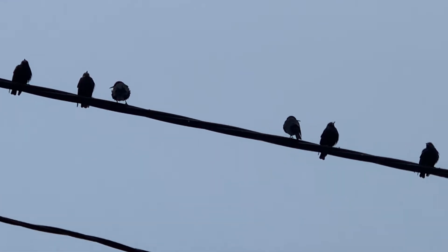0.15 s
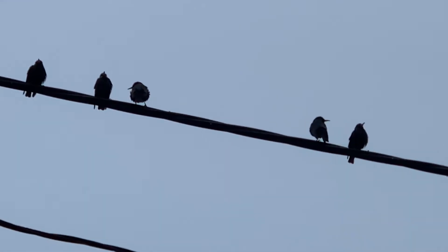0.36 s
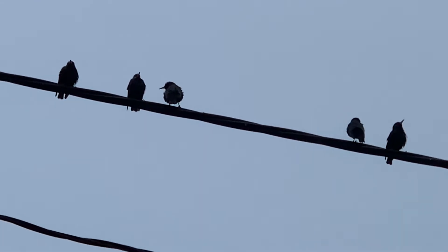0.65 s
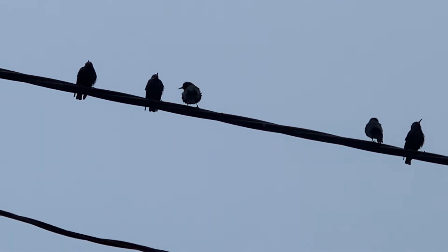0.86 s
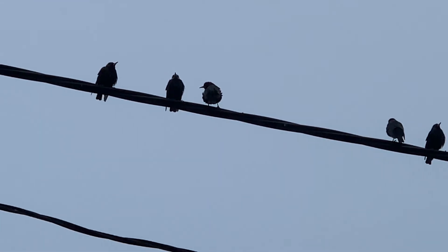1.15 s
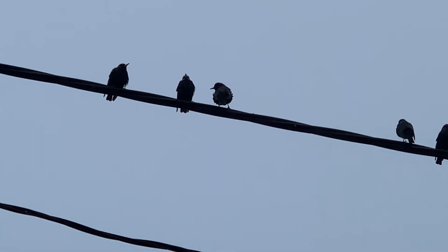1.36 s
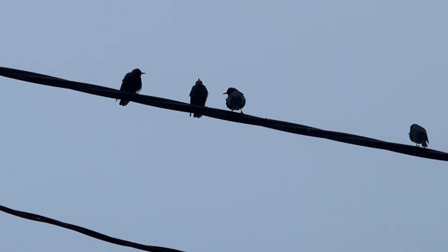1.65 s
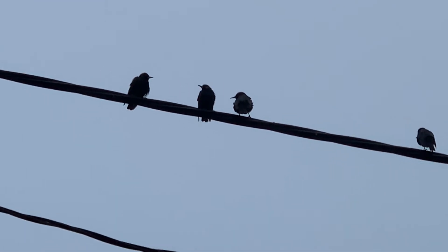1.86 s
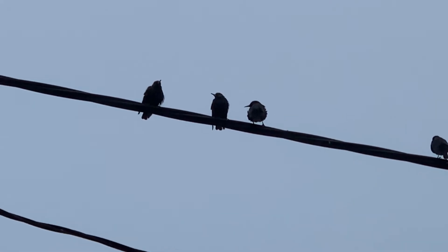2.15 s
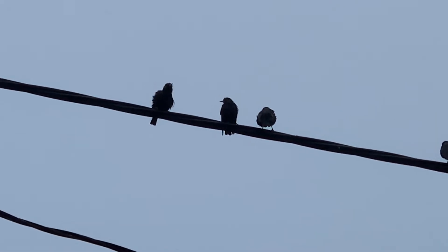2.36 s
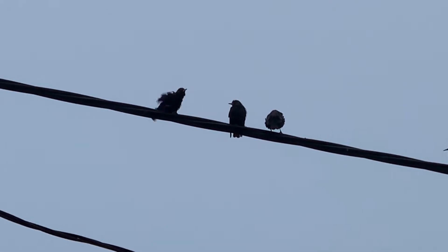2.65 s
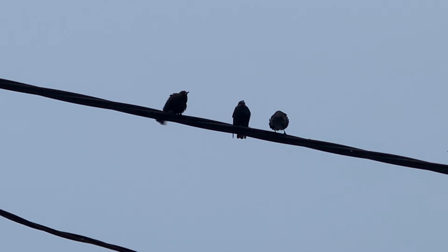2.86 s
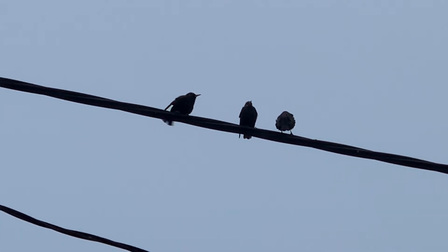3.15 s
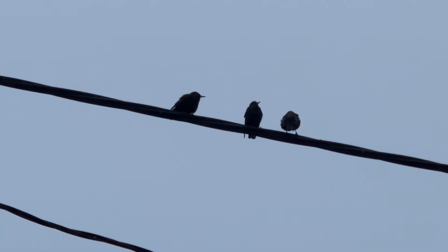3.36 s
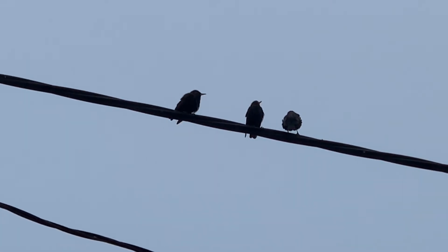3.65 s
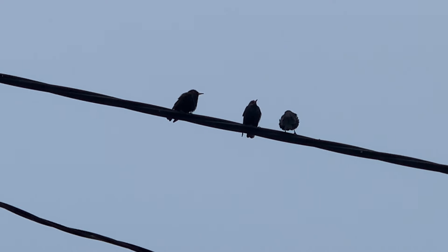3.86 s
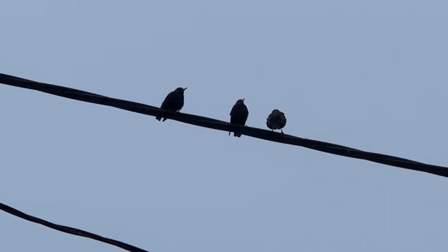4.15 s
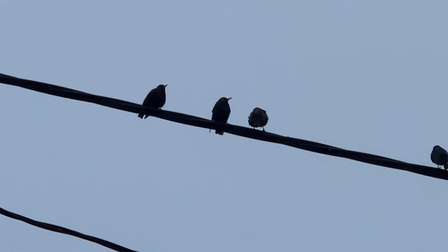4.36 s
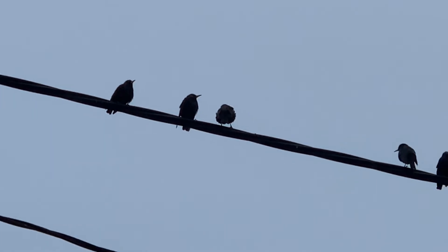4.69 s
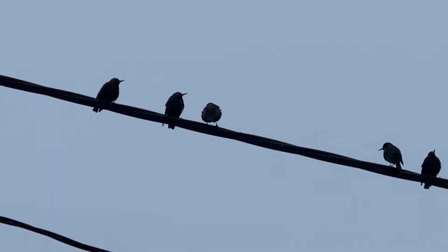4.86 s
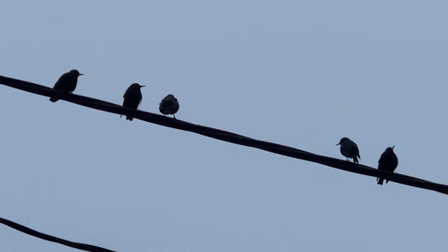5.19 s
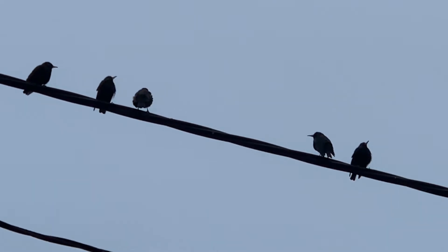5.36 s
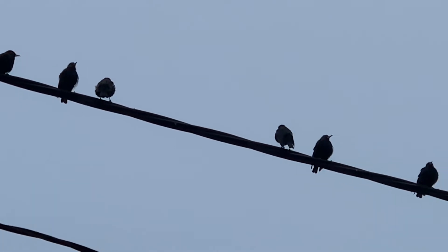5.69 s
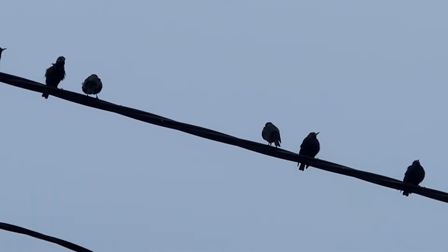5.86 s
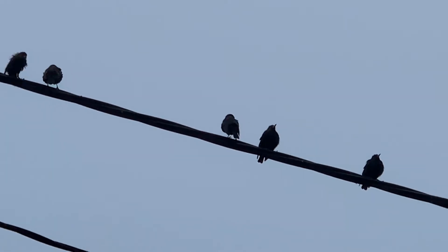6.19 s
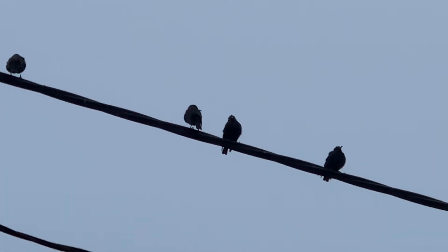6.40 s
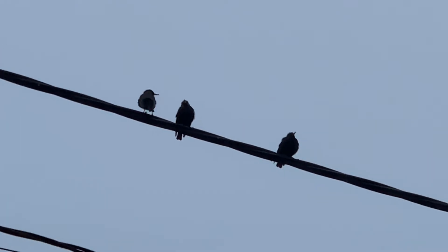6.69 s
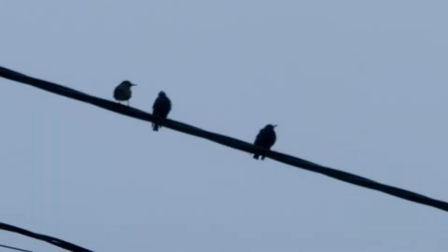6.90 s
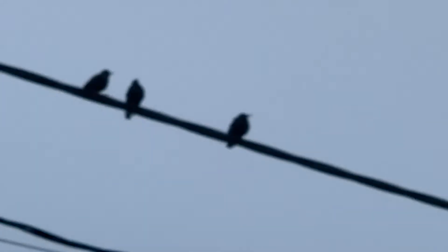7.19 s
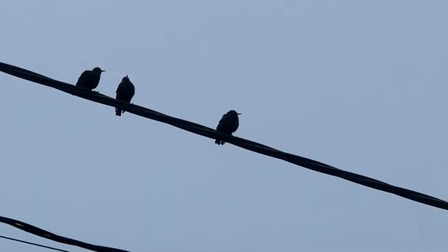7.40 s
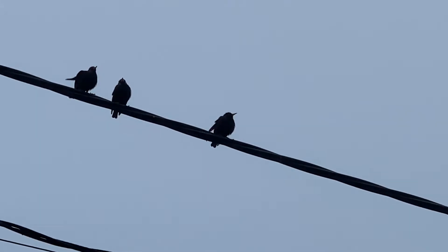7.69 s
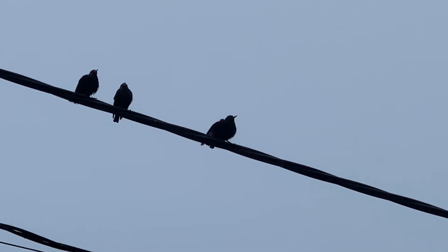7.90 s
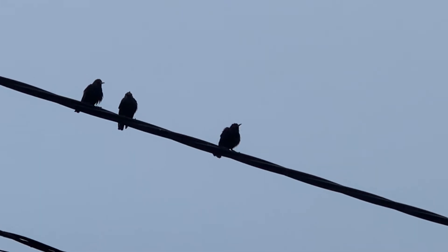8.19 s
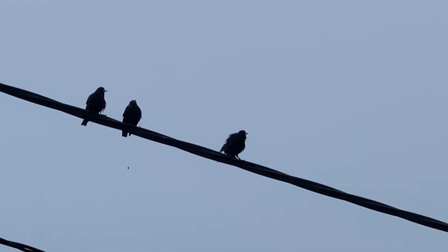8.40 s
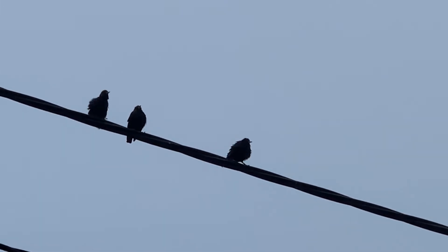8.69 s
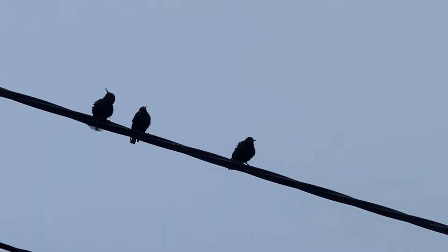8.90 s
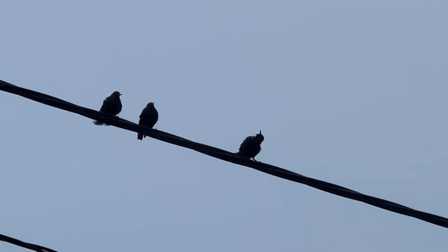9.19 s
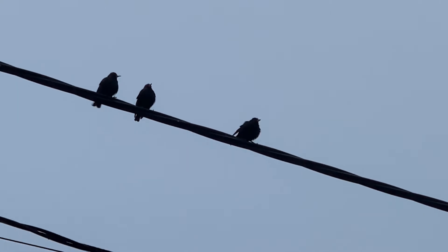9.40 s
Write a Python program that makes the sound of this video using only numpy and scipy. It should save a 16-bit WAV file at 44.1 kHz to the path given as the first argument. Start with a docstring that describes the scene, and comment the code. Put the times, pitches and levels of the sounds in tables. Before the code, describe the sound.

Starlings on overhead wires whistle, chirp and rasp throughout, one repeating a quick zigzag chirrup. The rest of the flock blurs into distant chatter with a light outdoor echo. In the second half, piercing high squeals and brief buzzes lead into a busier, hoarse flurry. Far traffic rumbles faintly underneath, and short knocks with soft thumps sound on the hand-held microphone now and then.

```python
"""Starlings on overhead wires

Near birds whistle, warble and rasp, and one keeps repeating a zigzag chirrup. Each voice is one tone
from the bird's voice box, shaken to make it hoarse. The rest of the flock blurs into far chatter with
outdoor echoes. Far traffic rumbles and hums, and the hand-held camera's body knocks now and then."""
import sys
import numpy as np
from scipy import signal
from scipy.fft import rfft, irfft, next_fast_len
from scipy.io import wavfile
from scipy.ndimage import uniform_filter1d, map_coordinates

SR = 44100
rng = np.random.default_rng(int(sys.argv[2]) if len(sys.argv) > 2 else 0)


def transcribe(signal):
    """Save signal, clipped to [-1, 1], as a 16-bit WAV file at the path in sys.argv[1]."""
    frames = np.atleast_2d(signal).T
    limited = np.clip(frames, -1, 1)
    pcm = np.round(limited * 32767).astype(np.int16)
    wavfile.write(sys.argv[1], SR, pcm)


N = 420713

# base loudness of the far flock: time_s, level_db
FLOCK_LEVEL = [(0.0, -59), (5.3, -58.5), (6.4, -57.5), (7.78, -57.5), (7.92, -56.5), (8.56, -61),
               (8.9, -56.5), (9.06, -56), (9.54, -57)]
STEPS = np.arange(-4, 5) / 4  # points in a note: -1 start, 0 loudest, 1 end


def amp(db):
    """Turn decibels into a gain."""
    return 10 ** (np.asarray(db) / 20)


def unit(x):
    """Scale to an average power of 1."""
    return x / np.sqrt(np.mean(np.abs(x) ** 2) + 1e-20)


def along(points, hz):
    """Read between (hz, value) points on a log scale."""
    known_hz, values = np.transpose(points)
    return np.interp(np.log(hz + 1), np.log(known_hz + 1), values)


def curve(rows):
    """Join (time, level) points into one value per sample."""
    return np.interp(np.arange(N) / SR, *np.transpose(rows))


def wobble(rate, size=N):
    """A smooth random curve through rate points a second."""
    points = rng.standard_normal(int(size * rate / SR) + 4)
    return map_coordinates(points, [np.arange(size) * rate / SR])


def filtered(x, response):
    """Multiply each frequency in x by response(hz)."""
    size = next_fast_len(N + SR // 2)
    return irfft(rfft(x, size) * response(np.fft.rfftfreq(size, 1 / SR)), size)[..., :N]


def add(track, start_s, sound):
    """Mix a sound into the track."""
    part = track[max(round(start_s * SR), 0):][:len(sound)]
    part += sound[:len(part)]


def rush(spectrum, alike, patchy_db):
    """Stereo noise with louder and softer patches; alike=1 makes both sides equal."""
    noise = signal.stft(rng.standard_normal((2, N)), nperseg=512)[2]
    patches = uniform_filter1d(uniform_filter1d(rng.standard_normal(noise.shape[1:]), 6, 0), 10, 1)
    pair = signal.istft(noise * amp(patchy_db * unit(patches)), nperseg=512)[1][:, :N]
    middle, side = filtered(pair, lambda hz: amp(along(spectrum, hz)))
    turn = np.arccos(alike) / 2
    return unit(np.cos(turn) * middle + np.sin(turn) * np.array([side, -side]))


def sing(track, note, hoarse, flutter_hz=None, edge_s=0.0054):
    """Add one tone through (time, pitch, level) points; hoarseness shakes its size and phase."""
    flutter_hz = flutter_hz or 160 + 650 * hoarse
    times, hz, db = np.transpose(note)
    t = np.arange(times[0] - edge_s, times[-1] + edge_s, 1 / SR)
    fade = np.clip(np.minimum(t - t[0], t[-1] - t) / (2 * edge_s), 0, 1) ** 2
    shake = wobble(flutter_hz, len(t)) + 1j * wobble(flutter_hz, len(t))
    share = np.clip(hoarse, 0, 1)  # 0 is clear, 1 is all rasp
    pitch = uniform_filter1d(np.interp(t, times, hz), size=SR // 250)  # rounds the turns
    pitch *= 1 + .006 * wobble(45, len(t))  # a slight waver
    wave = np.exp(2j * np.pi * np.cumsum(pitch) / SR)
    overtone = amp(-31 + 20 * np.log2(pitch / 6500)) * wave ** 2  # clearer on high notes
    tone = np.real((np.sqrt(2 - 2 * share) + np.sqrt(share) * shake) * (wave + overtone))
    breakup_db = 3.5 * np.sqrt(share) * wobble(90, len(t))
    add(track, t[0], fade * amp(np.interp(t, times, db) + breakup_db) * tone)


def swell(rise_s, fall_s, swell_db_per_s=122.5, fade_db_per_s=88):
    """A note grows and dies away: times from its loudest point, and dB below it."""
    offset_s = np.where(STEPS < 0, rise_s, fall_s) * STEPS
    return offset_s, np.where(STEPS < 0, swell_db_per_s, fade_db_per_s) * abs(offset_s)


def far_birds(count=1000):
    """Short, slightly hoarse chirps rise, fall or peak at random moments."""
    out = np.zeros(N)
    for when, pitch, bend, tilt, life, softness in rng.random((count, 6)):
        start_s, length_s = when * N / SR, .012 + .045 * life ** 3
        hz = 2600 * 1.95 ** pitch
        db = -9 * softness - 16 * abs(np.log2(hz / 3700))
        note = [(start_s, hz * (1 - .2 * tilt), db - 4.5),
                (start_s + length_s / 2, hz * (.95 + 0.14 * bend), db),
                (start_s + length_s, hz * (0.75 + 0.35 * tilt), db - 2)]
        sing(out, note, hoarse=.4, flutter_hz=400)
    return amp(curve(FLOCK_LEVEL)) * unit(out)


def haze(join_in):
    """The farthest birds blur into a hiss that swells a little with the flock."""
    # tone colour of the blurred flock and air: frequency_hz, relative_db
    spectrum = [(710, -21), (1200, -23), (1840, -9), (4110, -7), (5430, -14), (6590, -12.5), (7330, -21.5),
                (8700, -19), (9280, -24.5), (10200, -38.5), (13800, -45.5), (15500, -36.5)]
    return amp(0.71 * curve(FLOCK_LEVEL) - 18.5) * join_in ** .5 * rush(spectrum, 0.27, patchy_db=4.3)


def traffic():
    """Far traffic makes a low, lumpy rumble."""
    # loudness of the traffic: time_s, level_db
    levels = [(0.0, -54), (.6, -53.5), (2.63, -57), (5.98, -56.5), (9.19, -63), (9.54, -54.5)]
    # tone colour of the rumble: frequency_hz, relative_db
    spectrum = [(13, -36.5), (28, -0.5), (50, 3), (107, -3.5), (130, -7), (167, -12), (381, -28.5),
                (701, -30.5), (1600, -26), (2080, -68), (3520, -120)]
    return amp(curve(levels) + 1.3 * wobble(6)) * rush(spectrum, 0.92, patchy_db=2.2)


def chirrups(track):
    """One bird repeats a zigzag, a little different each time."""
    # shape of the zigzag: offset_s, pitch_hz, relative_db
    zigzag = [(-.029, 3400, -14), (-.012, 4200, -8), (-.005, 5300, 0), (.014, 5150, 0), (.031, 3800, 0),
              (.04, 4480, -2), (.05, 3300, -6), (.055, 3250, -22), (.063, 3400, -12), (.074, 4050, -4),
              (.086, 4600, -1), (.101, 3450, -5)]
    # each chirrup: time_s, level_db, pitch_factor, length_factor, opening_db
    calls = [(0.055, -48.5, .98, 1.0, -15), (1.168, -53, .98, 1.0, -6), (1.875, -45, 1.02, 1.0, -12),
             (2.59, -45, 1.0, 1.02, -14), (3.358, -46, 1.03, 1.02, -11), (4.394, -44, 1.0, 1.02, -13),
             (5.264, -49, 1.02, 1.08, -10), (5.914, -46, 1.0, 1.0, -12), (6.508, -42, 1.0, 0.98, -11),
             (7.459, -43, 1.0, 0.98, -13), (7.767, -46.5, 1.0, 1.0, -26), (8.97, -45, 0.91, 1.0, -26)]
    for time_s, db, pitch, length, opening_db in calls:
        note = np.array(zigzag) * [length, pitch, 1] + [time_s, 0, db]
        note[:4, 2] += opening_db  # softens the rise and first top
        sing(track, note, hoarse=.08, flutter_hz=330)


def echoes(x, decay_s):
    """Ground, trees and walls scatter the sound back; treble dies sooner."""
    hz, t, noise = signal.stft(rng.standard_normal((2, SR // 2)), SR, nperseg=256)
    fade = amp(-60 * t / decay_s * (0.18 + hz[:, None] / 9000))
    tail = signal.istft(noise * fade, SR, nperseg=256)[1]
    delayed = np.pad(x, (300, 0))[None]
    return signal.fftconvolve(delayed, tail / np.linalg.norm(tail[0]), axes=1)[:, :N]


def shell_tones(t):
    """The camera's shell rings for a few cycles, one row per tone."""
    # tones of the shell: pitch_hz, relative_db, ring_s
    tones = [(814, 7.5, 0.009), (1260, 1, 0.0064), (422, -15, 0.012)]
    rings = np.array([amp(db - 60 * t / ring_s) * np.sin(2 * np.pi * hz * t) for hz, db, ring_s in tones])
    return rings * (1 - np.exp(-t / 0.0029)) ** 2


def knocks(track):
    """A blow rings the shell, and a low tone follows it, sliding down in pitch."""
    # blows on the camera body: time_s, base_db, extra_thump_db
    blows = [(0.088, -42.5, 6), (0.101, -42.5, 5.5), (0.435, -62, 21), (0.473, -47.5, 4),
             (1.282, -55.5, 16), (1.31, -49.5, -4), (1.467, -29, -6), (1.815, -33, -7.5), (2.15, -29.5, -9),
             (2.454, -38, -7), (2.48, -41.5, -5.5), (3.002, -51, 3), (3.253, -66, 20), (4.526, -47, 2),
             (4.748, -72, 23), (5.163, -54.5, 14.5), (7.021, -55, 10), (7.308, -42, 4), (7.331, -50.5, 4),
             (7.37, -46.5, 13.5), (7.482, -33, -6.5), (7.867, -27.5, -7), (8.397, -35, -1.5),
             (8.662, -36, -7), (8.703, -49, -2)]
    t = np.arange(SR // 12) / SR
    tones = shell_tones(t)
    phase = 2 * np.pi * np.cumsum(45 + 500 * np.exp(-t / 0.00637)) / SR
    thump = np.sin(phase) * (1 - np.exp(-t / 0.028)) * amp(-60 * t / 0.085)
    for time_s, db, thump_db in blows:
        ring = amp(1.5 * rng.standard_normal(len(tones))) @ tones  # each blow hits another spot
        add(track, time_s - .001, amp(db + 19.5) * ring + amp(db + thump_db + 11.5) * thump)


def glides(track):
    """Near birds hold a note or slide straight up or down."""
    # sliding notes: loudest_s, swell_s, fade_s, from_hz, to_hz, level_db, hoarseness
    notes = [ (0.219, 0.046, 0.038, 1344, 1275, -62.5, 0.2), (.446, .008, .012, 5000, 2850, -64, 0.1),
             (.5, 0.061, .04, 4690, 5700, -61.5, 0.2), (.507, 0.0068, 0.01, 5600, 3140, -53, 0.15),
             (0.623, 0.014, 0.013, 2990, 1806, -44.5, 1), (.675, 0.014, 0.032, 2090, 2330, -47.5, 0.2),
             (1.025, 0.034, 0.003, 3270, 3480, -52.5, 0.94), (1.042, 0.0031, 0.055, 1700, 1688, -61, 0.1),
             (1.124, .035, .025, 4070, 3920, -58, .6), (1.193, 0.036, 0.016, 2910, 3000, -52.5, 0.4),
             (1.2, 0.07, 0.049, 1423, 1218, -66, 0.03), (1.49, 0.017, 0.022, 2440, 2054, -50, 0.24),
             (1.665, 0.033, 0.032, 4270, 4150, -59, 0.3), (1.727, 0.062, 0.038, 3320, 3080, -53.5, 0.43),
             (2.074, 0.011, 0.02, 3120, 2750, -52, 0.24), (2.12, 0.027, 0.011, 2100, 2400, -46.5, 0.37),
             (2.14, 0.045, 0.096, 4530, 4150, -56, .6), (2.46, 0.078, 0.065, 2960, 2600, -55.5, .3),
             (2.452, 0.0095, 0.015, 3960, 3400, -47.5, .3), (2.508, 0.024, 0.071, 3420, 3220, -47, 0.43),
             (2.825, .027, .027, 4470, 3200, -53.5, 0.25), (2.89, .04, 0.051, 3800, 4070, -54, 0.97),
             (3.008, 0.15, 0.12, 9660, 7200, -65.5, 0.2), (3.102, 0.043, 0.053, 4040, 3470, -52.5, .5),
             (3.254, 0.16, 0.14, 8670, 6300, -67, 0.75), (3.18, 0.013, 0.015, 2715, 2970, -46.5, 0.6),
             (3.355, 0.014, 0.038, 3870, 3700, -51.5, 0.56), (3.42, .04, 0.061, 3300, 3000, -50, 0.94),
             (3.72, 0.025, 0.054, 7600, 7050, -62, 0.2), (3.715, 0.0098, 0.017, 4250, 3940, -48, 0.6),
             (3.999, 0.031, 0.069, 4080, 4050, -56.5, .5), (4.11, 0.064, 0.094, 8980, 7100, -63, 0.7),
             (4.238, 0.025, 0.011, 3470, 2810, -51, 0.5), (4.525, 0.053, 0.063, 3110, 2835, -50, 0.75),
             (4.794, 0.014, 0.0074, 4040, 4000, -49, 0.36), (4.862, 0.035, 0.055, 2830, 3260, -49, .9),
             (4.894, 0.0095, 0.03, 3680, 4350, -49.5, 0.26), (5.305, 0.0051, 0.16, 3855, 3510, -46, 0.78),
             (5.499, 0.017, 0.012, 4250, 5200, -56.5, 0.4), (5.52, .02, 0.011, 3000, 3320, -53, 0.23),
             (5.777, 0.015, 0.02, 4300, 3750, -49.5, 0.14), (6.258, 0.0088, 0.1, 3950, 3980, -56, 0.6),
             (6.41, 0.02, 0.015, 3970, 3980, -51, 0.3), (6.433, 0.011, .008, 3110, 3230, -49.5, 0.52),
             (6.635, 0.04, 0.037, 2530, 2206, -50, 1.1), (6.65, 0.054, 0.046, 1500, 1350, -63.5, 1.13),
             (7.336, 0.014, 0.035, 4040, 3500, -49, .3), (7.385, 0.017, 0.035, 3060, 3670, -47, 0.18),
             (7.5, 0.19, 0.023, 9700, 9400, -51, 0.8), (7.93, 0.065, 0.072, 4010, 3830, -48, .8),
             (7.905, 0.011, 0.023, 3170, 3010, -48, 0.4), (8.0, 0.014, 0.027, 4315, 3400, -45, 0.74),
             (7.974, 0.056, 0.097, 6630, 6500, -47, 0.67), (8.086, 0.0088, 0.012, 3430, 3530, -50, .5),
             (8.135, 0.13, 0.019, 6250, 4400, -52, 1.03), (8.21, 0.013, 0.041, 8300, 10060, -58.5, 0.55),
             (8.312, 0.066, 0.012, 4960, 6620, -55, 0.8), (8.369, 0.029, 0.029, 8220, 8130, -49, 0.17),
             (8.409, 0.22, 0.1, 6810, 6720, -44, 1.2), (8.419, 0.027, 0.0098, 8360, 4860, -44.5, 0),
             (8.519, 0.017, 0.032, 6100, 4500, -47.5, 0.27), (8.545, 0.027, 0.065, 10260, 8570, -65, 0.2),
             (8.598, 0.054, 0.1, 4580, 4090, -52.5, 0.4), (8.67, 0.013, 0.049, 3260, 3320, -49.5, 0.65),
             (8.782, 0.052, 0.084, 7200, 6290, -46, 0.8), (8.865, 0.021, 0.058, 5550, 4530, -56.5, 1.1),
             (8.935, 0.017, 0.022, 4850, 4140, -52, 0.1), (8.985, .03, .035, 5150, 4900, -51.5, 1),
             (9.185, 0.0098, 0.015, 3130, 3800, -49, 0), (9.018, 0.019, 0.013, 5800, 10300, -54, 1.1),
             (9.064, 0.028, 0.023, 9260, 9850, -60.5, 0.5), (9.138, 0.018, 0.012, 4360, 3050, -47.5, 0.5),
             (9.225, 0.023, 0.025, 1980, 2040, -60, 0.2), (9.18, 0.045, 0.074, 5780, 6760, -56, 0.74),
             (9.504, 0.021, 0.019, 2640, 3020, -50, 0.07)]
    for loudest_s, swell_s, fade_s, from_hz, to_hz, db, hoarse in notes:
        offset_s, drop_db = swell(swell_s, fade_s)
        pitch = from_hz + (to_hz - from_hz) * (offset_s + swell_s) / (swell_s + fade_s)
        sing(track, np.c_[loudest_s + offset_s, pitch, db - drop_db], hoarse)


def scuffs(track):
    """Rubbing fingers ring the shell with uneven grains of friction."""
    # finger rubs: start_s, length_s, level_db
    rubs = [(0.312, 0.24, -65.5), (7.01, 0.048, -62), (7.342, 0.053, -61.5)]
    ring = shell_tones(np.arange(SR // 400) / SR).sum(0)
    for start_s, length_s, db in rubs:
        size = round(length_s * SR)
        grains = rng.standard_normal(size) * amp(3.1 * wobble(149, size)) * np.hanning(size) ** .5
        add(track, start_s, amp(db) * unit(np.convolve(grains, ring)))


def arches(track):
    """Near birds chirp up to a top pitch and down again."""
    # arched chirps: top_s, rise_s, fall_s, foot_hz, top_hz, level_db, hoarseness
    chirps = [ (0.594, 0.01, 0.035, 3780, 4040, -49.5, 0.2), (0.653, .027, 0.042, 3250, 3550, -47.5, 0.35),
              (.975, 0.07, 0.033, 3690, 4190, -56, 0.8), (3.43, .095, 0.067, 5870, 6590, -47.5, 0.4),
              (3.864, .024, .014, 2800, 4000, -48, 0), (4.11, 0.12, 0.14, 5590, 6260, -58.5, 0.2),
              (4.187, 0.013, 0.019, 3650, 4900, -53, 0.56), (4.734, 0.0062, 0.016, 3220, 3870, -53.5, 0.1),
              (4.829, .017, 0.03, 3900, 5050, -51.5, 0.7), (4.87, .009, 0.011, 4000, 5020, -56, 0),
              (5.553, 0.024, 0.016, 3350, 4050, -49, 0.5), (5.706, .013, 0.012, 3000, 3600, -59, 0.3),
              (5.76, 0.012, 0.0063, 4250, 5410, -53.5, 0.1), (5.666, 0.0099, 0.016, 3800, 4400, -62, 0.2),
              (5.84, 0.021, 0.015, 3050, 4050, -49.5, 0.3), (6.44, 0.0076, 0.0039, 3850, 4600, -53.5, .2),
              (6.482, 0.017, 0.016, 2750, 3400, -43, 0.5), (6.682, 0.011, .012, 3800, 4450, -56.5, 0.1),
              (6.845, 0.014, 0.023, 3720, 4620, -53, 0.3), (6.922, 0.041, 0.011, 3105, 3735, -45.5, 0.3),
              (7.04, 0.045, 0.085, 3650, 4080, -52, 0.7), (7.223, 0.019, 0.016, 3720, 5240, -54, .14),
              (7.67, 0.0091, 0.018, 3330, 4280, -57.5, 0.08), (8.297, 0.013, 0.027, 3790, 5410, -51.5, 0.3),
              (8.374, 0.019, 0.019, 3550, 4620, -49.5, 0.08), (8.455, 0.021, 0.016, 5080, 6040, -45.5, 0.2),
              (8.624, 0.045, 0.053, 3490, 3970, -49.5, 0.7), (9.383, 0.01, 0.023, 3610, 4450, -53, 0.2),
              (9.302, 0.056, 0.052, 6400, 7900, -53, 0.9)]
    for top_s, rise_s, fall_s, foot_hz, top_hz, db, hoarse in chirps:
        offset_s, drop_db = swell(rise_s, fall_s)
        pitch = foot_hz + (top_hz - foot_hz) * (1 - abs(STEPS) ** 1.6)
        sing(track, np.c_[top_s + offset_s, pitch, db - drop_db], hoarse)


def squeals(track):
    """Near birds give piercing high squeals."""
    # one list of points per squeal: time_s, pitch_hz, level_db
    notes = [
        [(1.125, 7770, -72), (1.145, 8130, -58), (1.169, 8730, -53), (1.197, 8740, -56), (1.225, 9100, -60.5),
         (1.26, 9120, -63)],
        [(1.63, 7690, -79), (1.666, 8270, -65), (1.73, 8250, -66), (1.755, 8430, -60), (1.78, 8300, -80)],
        [(5.415, 7360, -60), (5.428, 8370, -52), (5.445, 8000, -49.5), (5.49, 8620, -51), (5.52, 8750, -46),
         (5.538, 8060, -52), (5.552, 8800, -48), (5.62, 8870, -58), (5.69, 8350, -62.5)],
        [(6.455, 7770, -50), (6.471, 8900, -52), (6.487, 9460, -48.5), (6.533, 9040, -37), (6.567, 8950, -41.5),
         (6.623, 8970, -47), (6.701, 8950, -52.5), (6.73, 8550, -68)],
        [(7.31, 7430, -56), (7.332, 8700, -44), (7.35, 9060, -39), (7.424, 8930, -39), (7.44, 8770, -49),
         (7.488, 9100, -51.5), (7.53, 8930, -55), (7.57, 9040, -75)],
    ]
    for note in notes:
        sing(track, note, hoarse=.2)


def engine_hum():
    """A far engine hums faintly, drifting in pitch."""
    # one list of points per hum: time_s, pitch_hz, level_db
    hums = [
        [(2.2, 268, -79), (2.9, 265, -77), (3.5, 238, -79)],
        [(5.25, 228, -78), (6.4, 260, -75)],
    ]
    out = np.zeros(N)
    for note in hums:
        sing(out, note, hoarse=.21, flutter_hz=57, edge_s=.11)
    return out


def falling_whistle(track):
    """A bird lets one long, thin whistle fall."""
    # path of the whistle: time_s, pitch_hz, level_db
    note = [(3.9, 2570, -58), (3.942, 2450, -57), (3.98, 1960, -56), (4.03, 1840, -56), (4.07, 1780, -68),
            (4.2, 1610, -71), (4.3, 1560, -64), (4.365, 1390, -66), (4.5, 1300, -71)]
    sing(track, note, hoarse=.02)


def rattles(track, beats_per_s=175, dip_db=22):
    """A bird's high tone pulses so fast that it buzzes."""
    # buzzy rattles: start_s, length_s, pitch_hz, level_db
    buzzes = [(8.158, 0.039, 8300, -50.5), (6.371, 0.05, 8860, -41), (7.227, 0.06, 8880, -41.5)]
    for start_s, length_s, hz, db in buzzes:
        t = np.arange(0, length_s, 1 / SR)
        level_db = db - dip_db * np.sin(np.pi * beats_per_s * t) ** 2
        sing(track, np.c_[start_s + t, np.full_like(t, hz), level_db], hoarse=.4)


def pip(track):
    """One low, soft pip sounds."""
    # path of the pip: time_s, pitch_hz, level_db
    note = [(6.832, 500, -87), (6.838, 475, -47), (6.859, 515, -55.5)]
    sing(track, note, hoarse=.024, flutter_hz=60)


def microphones(x, left_lag_s=0.0002195):
    """The two microphone openings differ in tone, and the left hears later."""
    # balance of the openings: frequency_hz, left_minus_right_db
    balance = [(700, 0.5), (1500, -2.5), (3000, -3.5), (5500, -7.5), (8000, 0.5)]
    sides = np.array([[.5], [-.5]])
    return filtered(x, lambda hz: amp(sides * along(balance, hz))
                    * np.exp(-2j * np.pi * sides * hz * left_lag_s))


def scene():
    """Mix birds, echoes, traffic and camera handling in stereo."""
    near, handling = np.zeros((2, N))
    for call in (squeals, falling_whistle, arches, glides, rattles, chirrups):
        call(near)
    near_level = uniform_filter1d(np.abs(filtered(near, lambda hz: hz < 6000)), size=SR // 10)
    join_in = unit(np.sqrt(0.17 + unit(near_level)))  # the flock answers its neighbours
    far = far_birds() * join_in
    bright = filtered(near, lambda hz: hz ** 4 / (hz ** 4 + 2300 ** 4))  # low whistles barely echo
    birds = near + far + amp(-8) * echoes(bright, .26) + amp(-5.5) * echoes(far, .11)
    background = haze(join_in) + engine_hum() + traffic()
    for sound in (knocks, scuffs, pip):
        sound(handling)
    left = np.pad(handling, (round(.00007 * SR), 0))[:N]  # reaches the left later through the shell
    return microphones(birds + background + np.array([left, handling]))


def record(dry, bass_hz=33, top_hz=15670):
    """The camera weakens the deepest bass and cuts off the highest treble."""
    return filtered(dry, lambda hz: (hz < top_hz) * hz ** 4 / (hz ** 4 + bass_hz ** 4))


dry = scene()
out = record(dry)
transcribe(out)
```